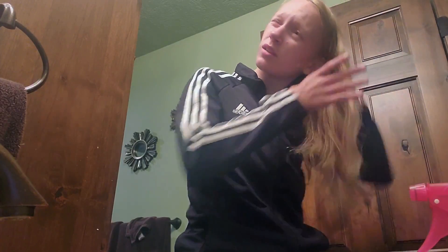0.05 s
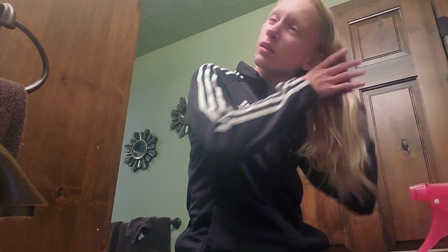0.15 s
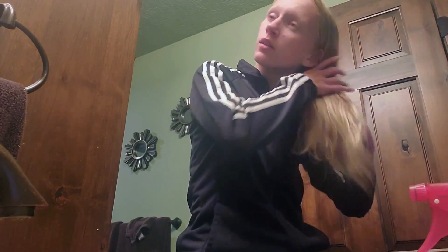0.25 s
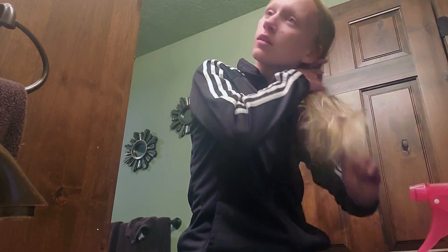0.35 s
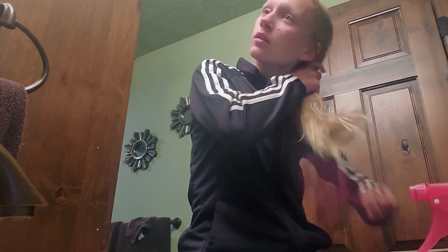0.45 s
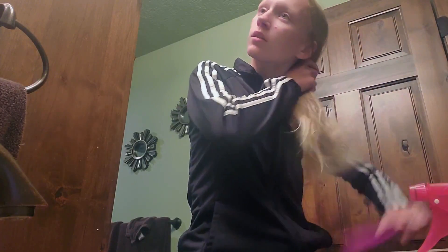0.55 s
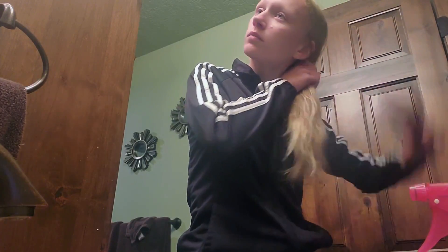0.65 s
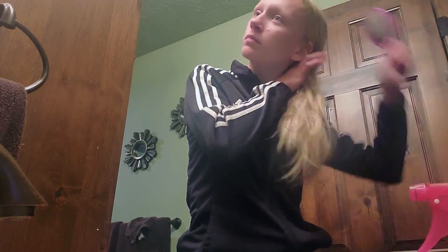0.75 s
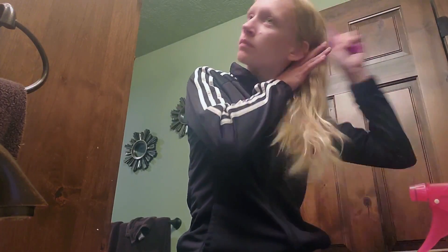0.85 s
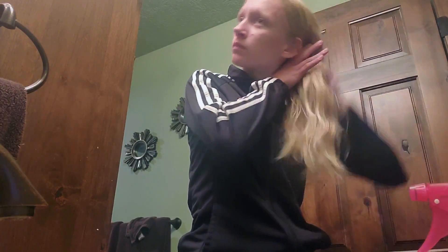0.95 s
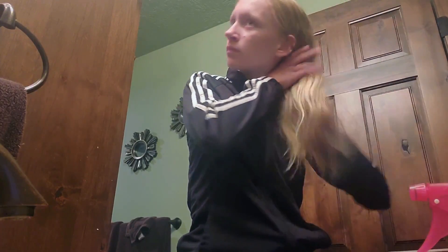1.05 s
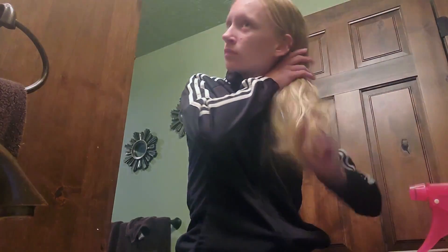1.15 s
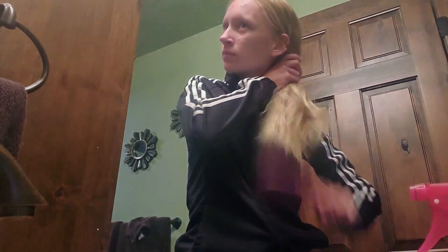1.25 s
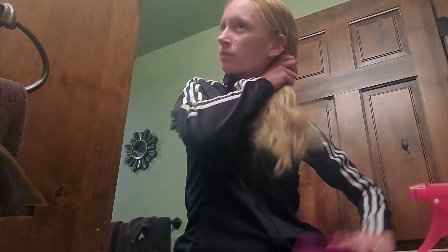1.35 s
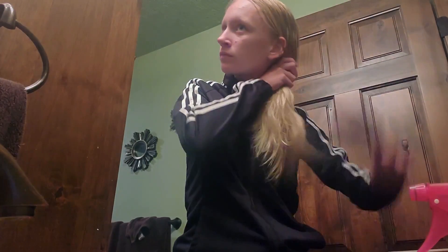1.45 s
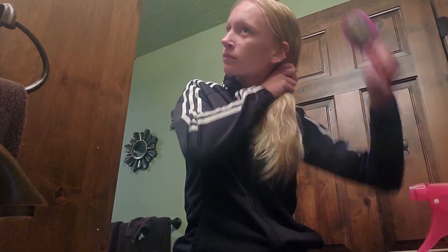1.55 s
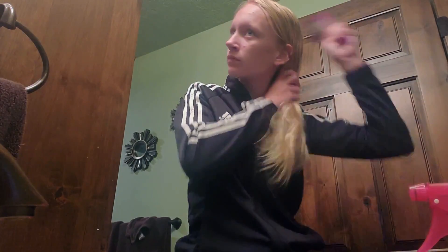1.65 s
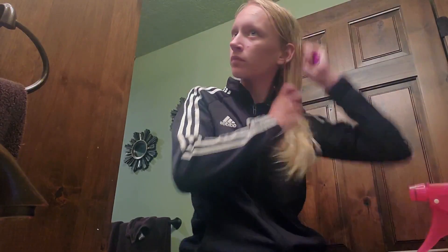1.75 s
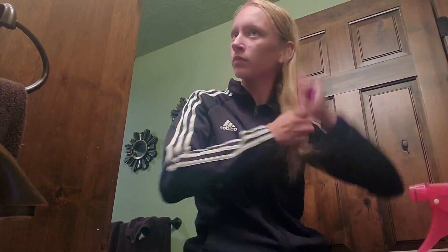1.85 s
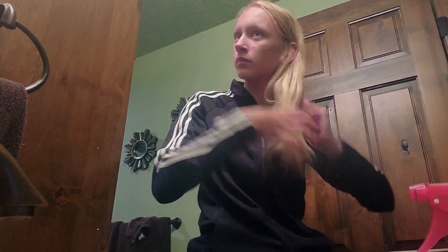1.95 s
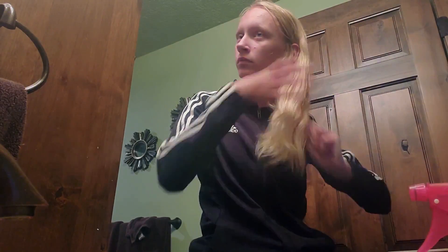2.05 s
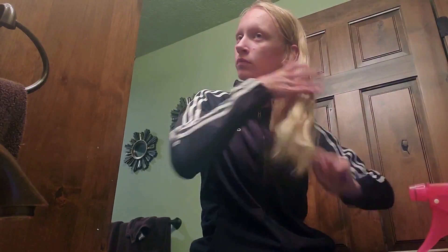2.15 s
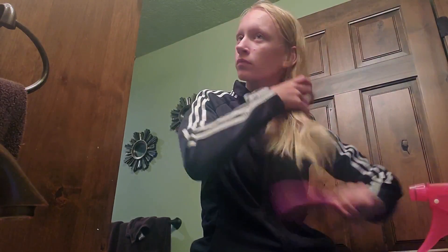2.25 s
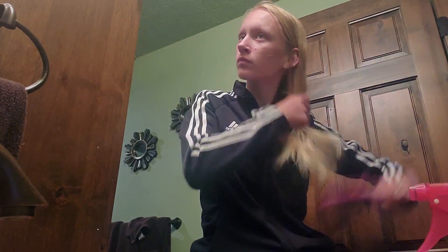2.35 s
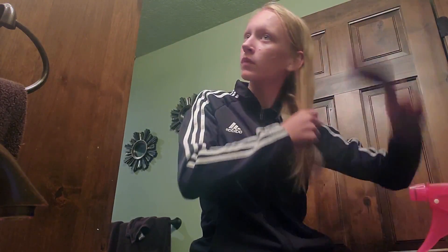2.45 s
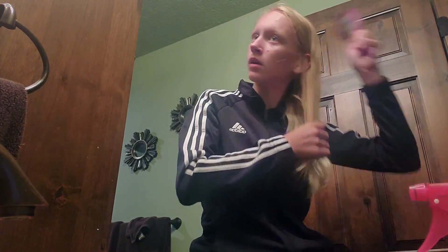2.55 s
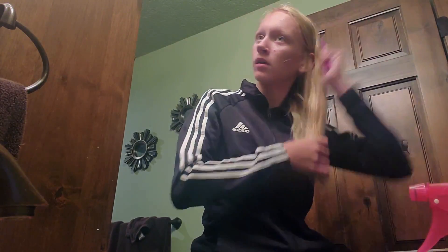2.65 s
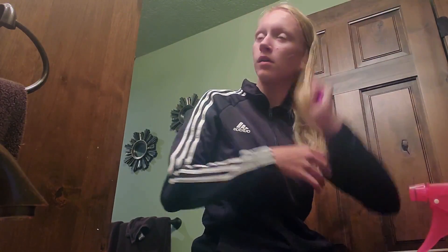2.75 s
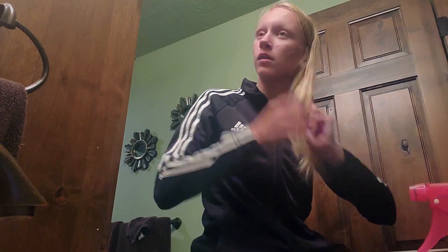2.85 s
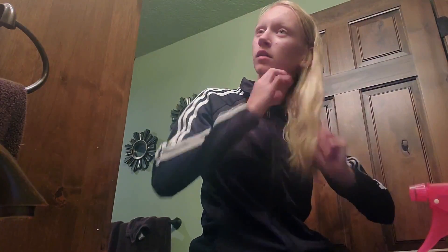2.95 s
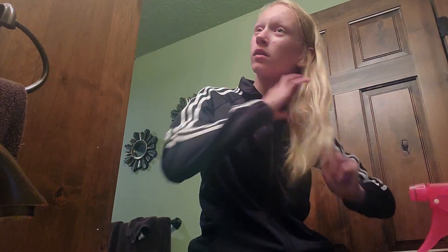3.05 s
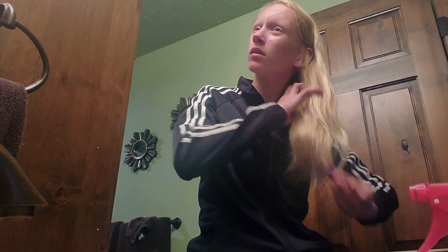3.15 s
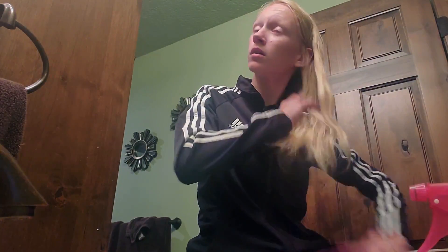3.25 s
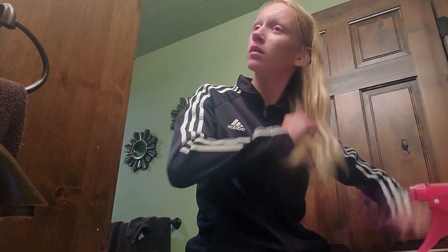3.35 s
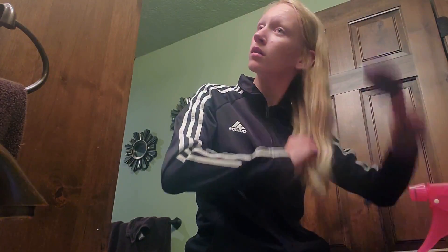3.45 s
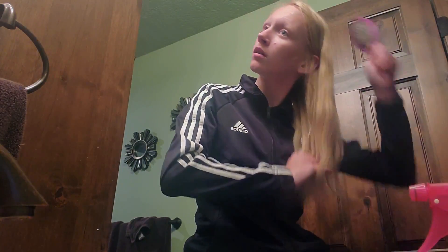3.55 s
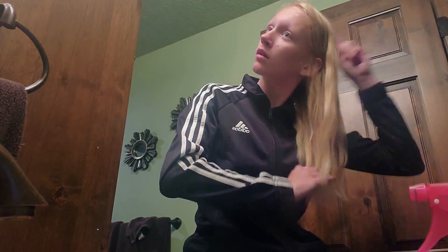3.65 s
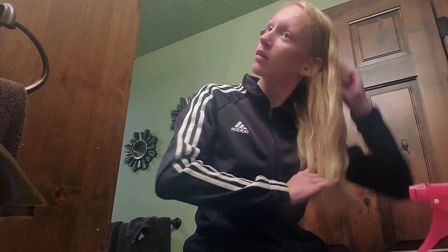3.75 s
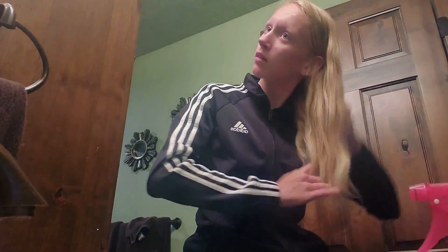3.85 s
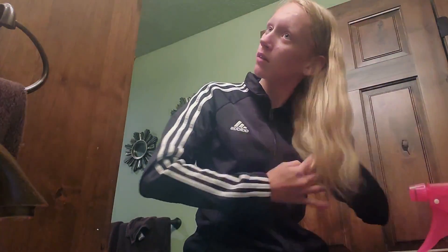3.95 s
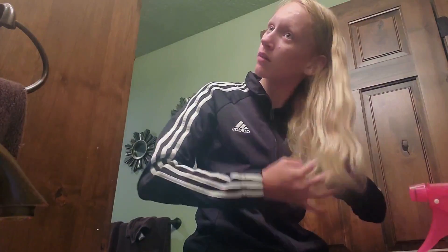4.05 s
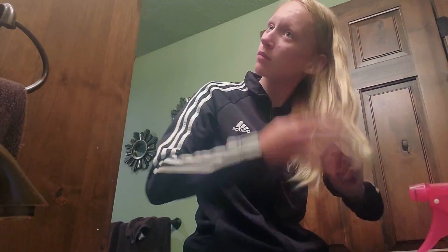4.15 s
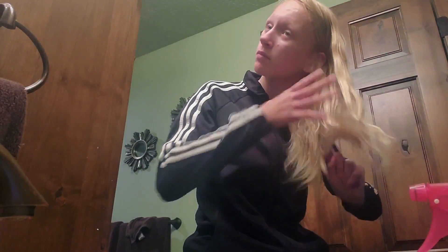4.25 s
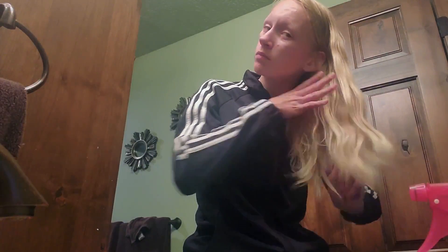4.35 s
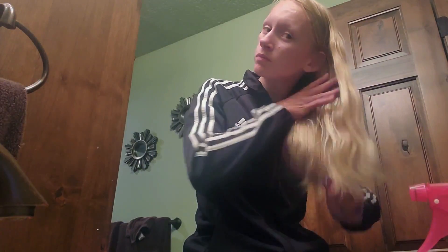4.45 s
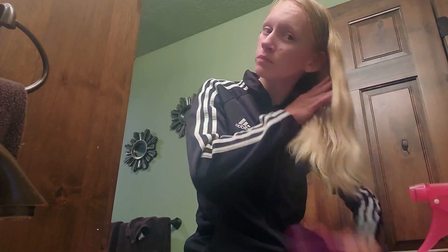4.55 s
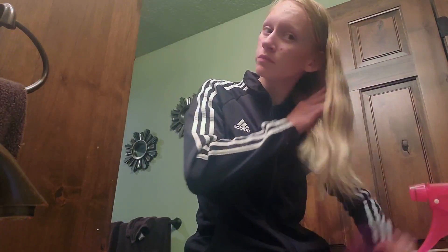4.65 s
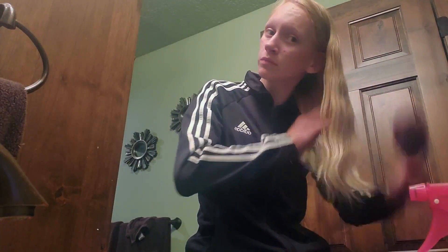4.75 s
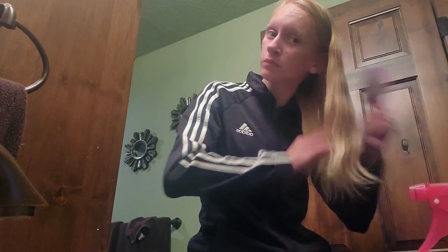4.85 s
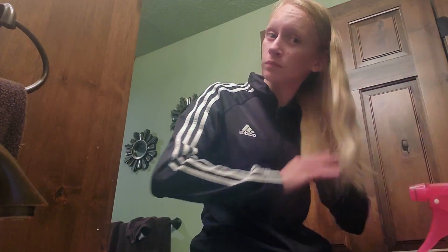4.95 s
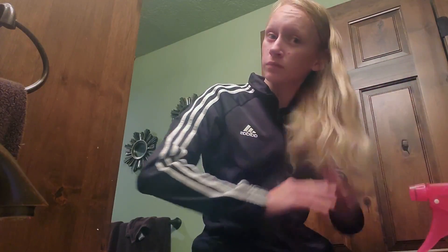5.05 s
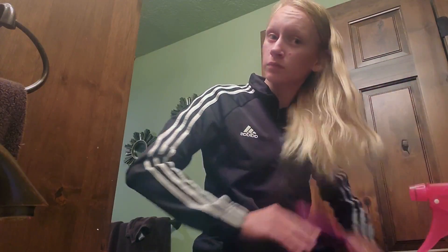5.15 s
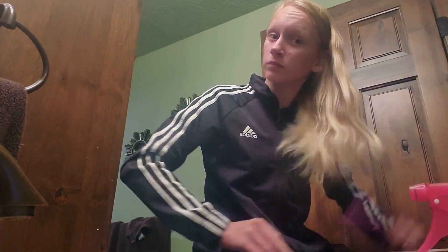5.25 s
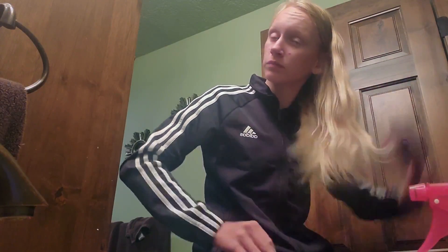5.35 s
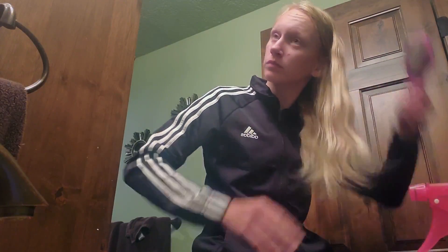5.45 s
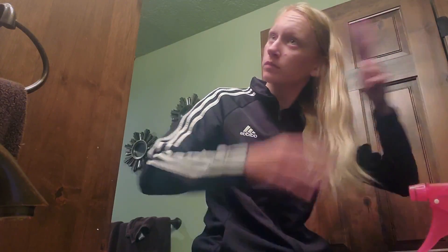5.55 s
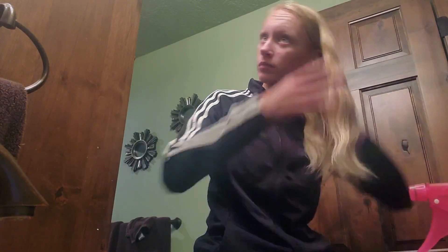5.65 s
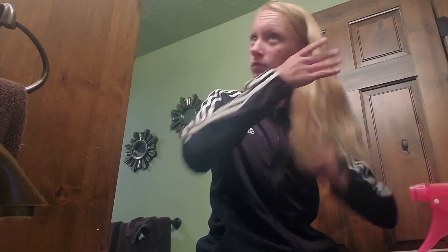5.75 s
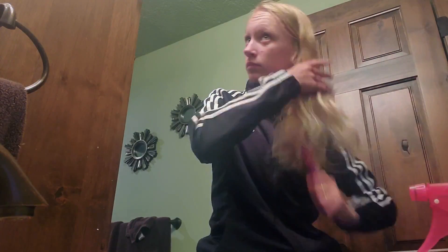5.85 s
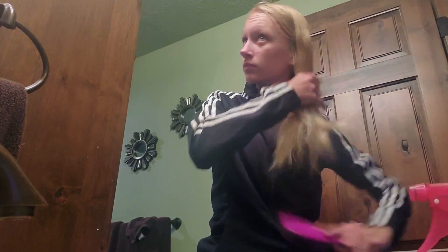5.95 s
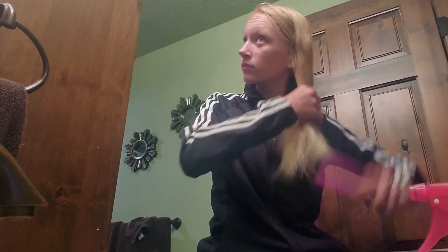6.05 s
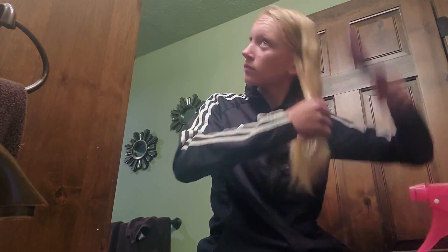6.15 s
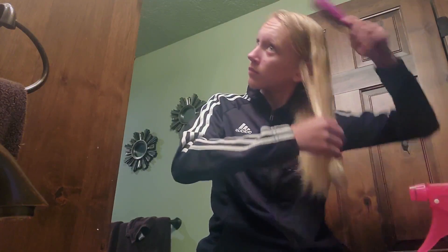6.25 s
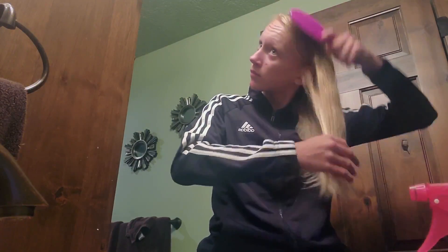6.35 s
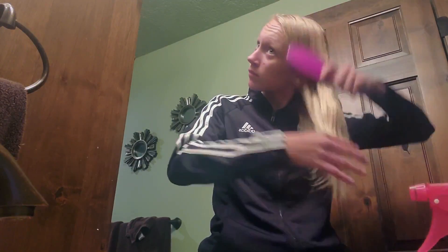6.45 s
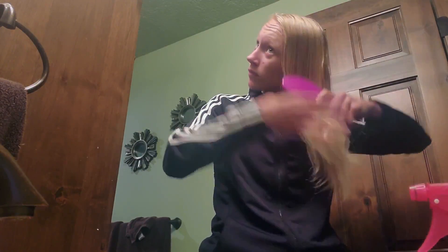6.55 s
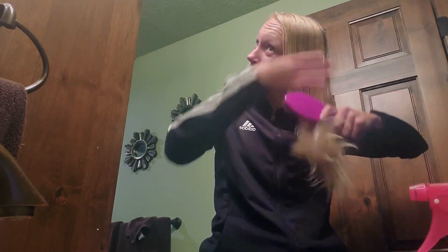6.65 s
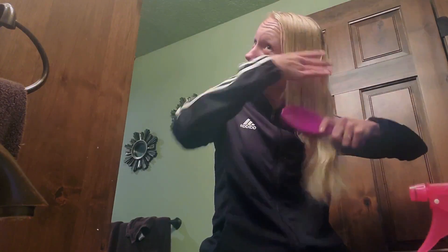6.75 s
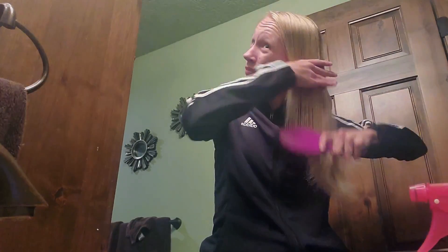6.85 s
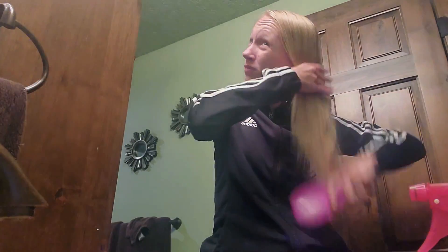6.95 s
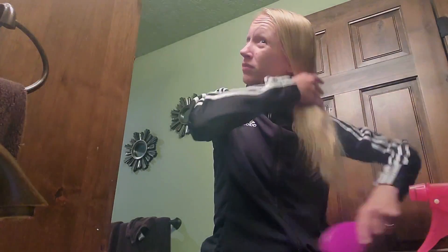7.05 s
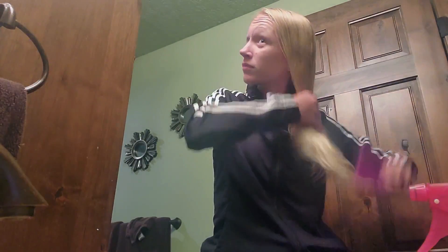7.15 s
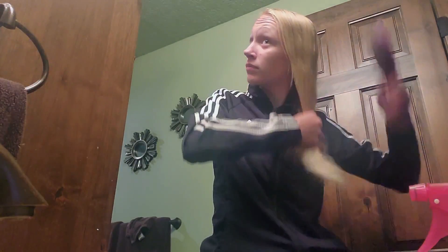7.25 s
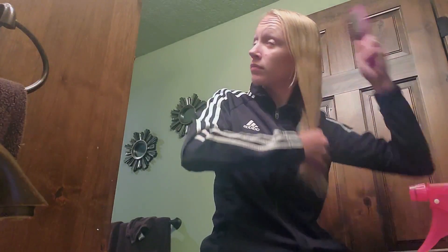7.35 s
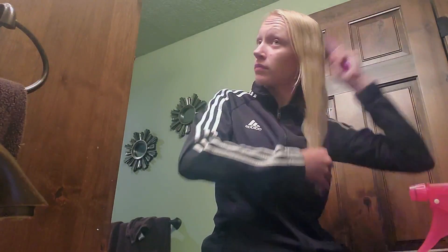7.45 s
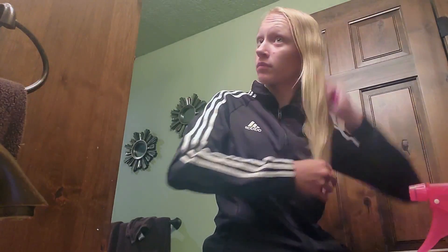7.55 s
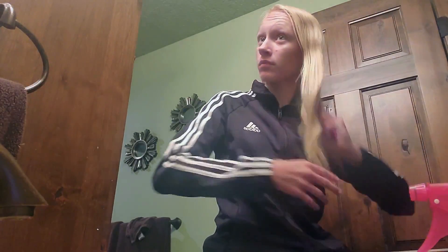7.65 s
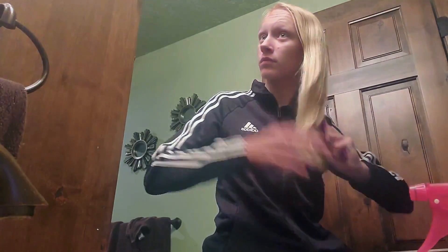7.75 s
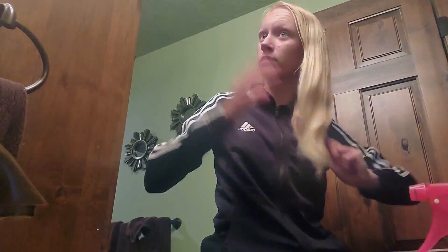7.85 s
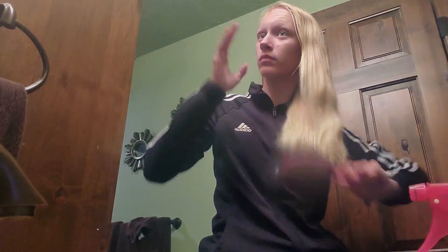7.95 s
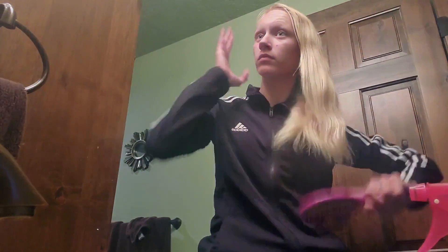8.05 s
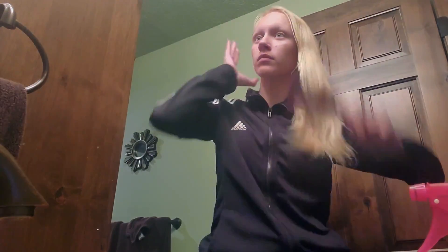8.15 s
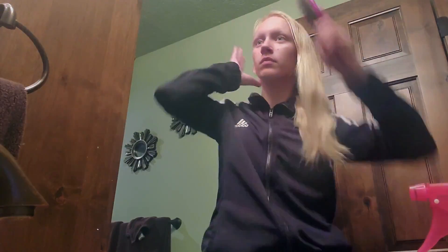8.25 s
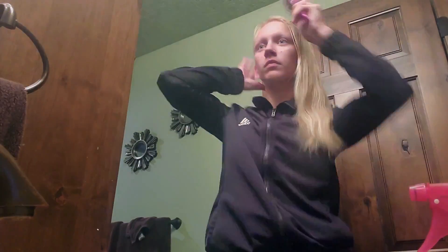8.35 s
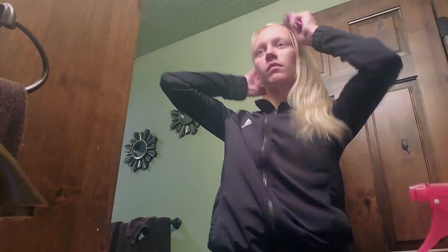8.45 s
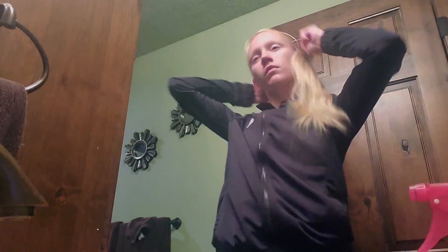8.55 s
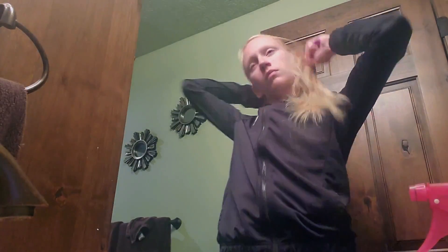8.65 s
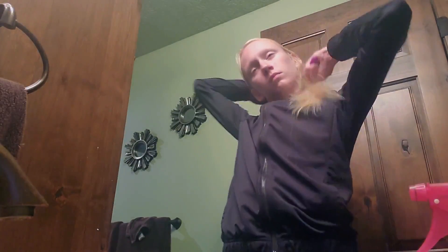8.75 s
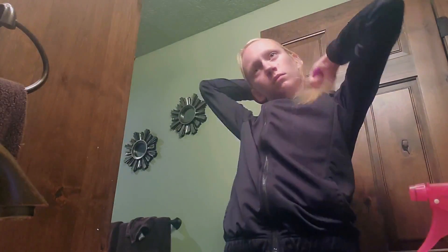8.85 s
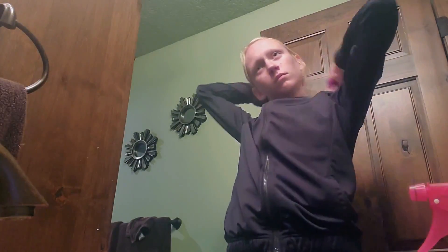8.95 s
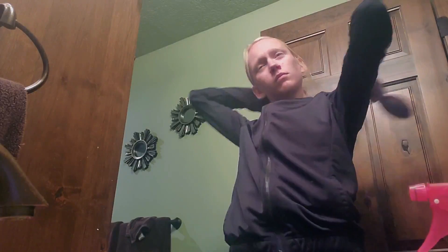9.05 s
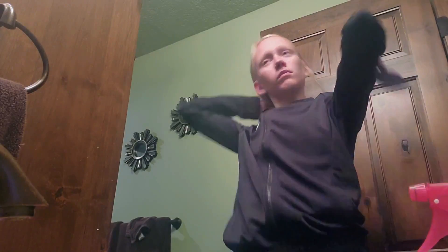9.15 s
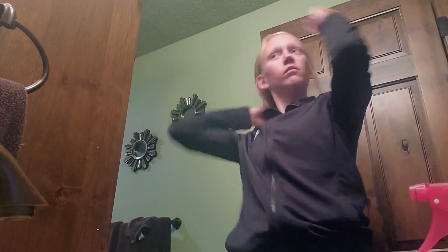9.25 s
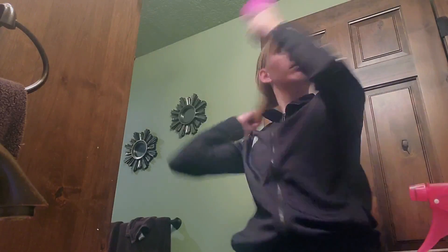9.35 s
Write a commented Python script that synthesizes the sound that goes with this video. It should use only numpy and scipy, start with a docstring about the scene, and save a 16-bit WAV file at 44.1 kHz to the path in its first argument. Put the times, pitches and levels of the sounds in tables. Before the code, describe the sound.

A cushion hairbrush is pulled through long damp hair in a small quiet bathroom, close to a stereo microphone. Strokes start right away and at about 1.0, 1.8, 2.7, 3.8, 4.3, 5.0, 5.6, 6.4, 7.5 and 8.5 seconds, each lasting roughly a quarter to two thirds of a second. They slide with a fine hiss, then rasp and crackle in tangles, with tiny snaps of snagged strands and soft hollow knocks from the pad. The strongest tugs come near 0.4, 1.3, 3.2, 4.5 and 7.9 seconds; the last stroke is gentler and ends around 9.1. Locks flick free with a brief crackle near 1.4, 3.0 and 8.7 seconds. The brush bumps dully against the head near 3.3, 5.0 and 6.4. Between strokes a jacket sleeve swishes very faintly over low, steady room noise.

```python
"""A cushion hairbrush is pulled through long damp hair in quick strokes, in a small quiet bathroom.
Sliding friction gives a fine hiss; in the tangled ends it turns to stick-slip motion and rasps.
Flicking bristles and soft knocks excite the modes of the hollow pad. Snagged strands snap, locks whip
free, the brush bumps the head and a sleeve rustles. A stereo microphone stands close by."""
import sys
import numpy as np
from scipy import signal
from scipy.fft import rfft, irfft, next_fast_len
from scipy.io import wavfile

SR = 44100
rng = np.random.default_rng(int(sys.argv[2]) if len(sys.argv) > 2 else 0)


def master_out(mix):
    """Clip the mix to full scale and print it as 16-bit PCM to the path in sys.argv[1]."""
    frames = np.transpose(np.atleast_2d(mix))
    ceiling = np.clip(frames, -1, 1)
    pcm = np.round(ceiling * 32767).astype(np.int16)
    wavfile.write(sys.argv[1], SR, pcm)


N = 414540
T = np.arange(N) / SR
SIZE = next_fast_len(N + SR)
FREQS = np.maximum(np.arange(SIZE // 2 + 1) * SR / SIZE, 1)


def undb(db):
    """Amplitude ratio of a level in decibels."""
    return 10 ** (np.asarray(db) / 20)

def unit(x):
    """Normalisation to rms 1."""
    return x / np.sqrt(np.mean(x ** 2))

def contour(points):
    """Spectral envelope: gain interpolated between (Hz, dB) points over log frequency."""
    hz, db = np.transpose(points)
    return undb(np.interp(np.log(FREQS), np.log(hz), db))

def resonances(modes, skirt_db):
    """Modal response: powers add, and the gain falls a further skirt_db an octave outside the modes."""
    power = sum(undb(db) ** 2 / (1 + ((FREQS / hz - hz / FREQS) * hz / width) ** 2)
                for hz, width, db in modes)
    octaves_outside = np.abs(np.log2(FREQS / np.clip(FREQS, modes[0][0], modes[-1][0])))
    return np.sqrt(power) * undb(-skirt_db * octaves_outside)

def ring(x, gain):
    """Minimum-phase filter of the given gain: it rings after a blow, never before."""
    cepstrum = irfft(np.log(gain + 1e-6), SIZE)
    cepstrum[1:SIZE // 2] *= 2
    cepstrum[SIZE // 2 + 1:] = 0
    return irfft(rfft(x, SIZE) * np.exp(rfft(cepstrum)), SIZE)[..., :N]

def bend(x, ratio):
    """Resampling shifts every frequency of a steady texture by a moving ratio."""
    place = np.cumsum(ratio) % N
    return np.array([np.interp(place, np.arange(N), channel) for channel in x])

def noise():
    """Uncorrelated white noise for mid and side."""
    return rng.standard_normal((2, N))

def waver(rate):
    """Random modulation: ramps between `rate` Gaussian values a second."""
    points = rng.standard_normal(N // 20)
    return np.interp(T * rate, np.arange(len(points)), points)

def fade(t60):
    """Half a second of exponential decay, falling 60 dB in t60 seconds."""
    return undb(-60 * T[:SR // 2] / t60)

def add(out, s, sound):
    """Superposition of a sound starting at s seconds."""
    start = int(s * SR)
    out[:, start:start + sound.shape[-1]] += sound[..., :N - start]

def slips(rate, scatter_db, t60):
    """Shot noise: tiny decaying bursts of uneven size, on average `rate` a second; rms 1."""
    onsets = rng.random(N) < rate / SR
    sizes = onsets * undb(scatter_db * np.minimum(rng.exponential(size=N), 3))
    energy = signal.lfilter([1], [1, -undb(-120 / (t60 * SR))], sizes ** 2)
    return unit(np.sqrt(energy) * noise())

def catches(rate, size, hold_s):
    """Stick-slip force: it jumps as strands catch at random and relaxes as they let go; rms 1."""
    jumps = (rng.random(N) < rate / SR) * size * rng.uniform(0.71, 1, N)
    energy = signal.lfilter([1], [1, -np.exp(-1 / (hold_s * SR))], jumps ** 2)
    return unit(np.sqrt(1 + energy))

def contact(length_s, swell_db, attack_s, release_s=0.023):
    """Contact envelope: it eases in, swells as hair gathers ahead of the brush, and decays once free."""
    t = T[:int((length_s + .5) * SR)]
    attack = np.sin(np.pi / 2 * np.minimum(t / attack_s, 1)) ** 1.415
    progress = np.minimum(t / length_s, 1)
    release = np.exp(-np.maximum(t - length_s, 0) / release_s)
    return attack * undb(swell_db * (progress - .5)) * release


# The brush slides down the hair. Each row: start, length and settling time of the hair in seconds,
# pull, friction and swell in dB, pitch ratio of the pad.
STROKES = [(0.021, 0.41, 0.0046, -53.5, -60.5, 17.5, 1.126), (0.964, 0.37, 0.056, -48, -53.5, 22, 1.064),
           (1.763, 0.46, 0.067, -47, -52, 12, 1.08), (2.725, 0.6, 0.088, -47, -51, 10, 1.08),
           (3.756, 0.5, 0.097, -52.5, -56.5, 2.5, 1.08), (4.28, 0.28, 0.016, -51.5, -55, 1.5, 1.0),
           (5.029, 0.2297, .12, -52.5, -61, 5, 0.98), (5.644, 0.3, .02, -58, -60.5, 16, 1.12),
           (6.411, 0.62, 0.15, -62.5, -58, 2.5, 1.23), (7.529, 0.48, .11, -50, -56, 6.5, 1.074),
           (8.501, 0.595, .16, -55.5, -56.5, 0.5, 1.14)]
# The bristles dig in or drag through a tangle. Each row: start and length in seconds, pull, friction
# and swell in dB, pitch ratio of the pad, handle thud and bristle rasp in dB.
TUGS = [(0.0, 0.028, -53, -54, -5, 1.16, -0.5, -7), (0.206, 0.11, -48, -52.5, 5.5, 0.99, 9, 9.5),
        (0.331, 0.078, -37, -41, 5.5, 1.006, -1.5, -1.5), (0.428, 0.082, -36, -42.5, 7, 0.9, -3.5, -2.5),
        (1.136, 0.084, -42, -49, 7, 1.13, 1, 3.5), (1.221, 0.095, -34.5, -42.5, 4, 0.94, -3, 0.5),
        (1.78, 0.025, -50, -72, -4, 1.33, 8, 1), (2.099, 0.13, -44, -49.5, 2.5, 1.06, -2, 0),
        (2.224, 0.067, -40, -41, -2, 1.04, 4.5, 3), (3.021, 0.27, -40.5, -45, 2, 1.05, -1, 0.5),
        (3.278, 0.032, -35.5, -43, -2, 0.89, 5, 2.5), (3.767, 0.039, -52, -84, -2, 1.52, -5, -9),
        (4.033, 0.19, -45.5, -56, 0.5, 1.043, -1, 3), (4.354, 0.021, -47, -56, -7, 1.07, 7, 9),
        (4.427, 0.053, -43, -47.5, 5.5, 1.01, -2, 3.5), (4.515, 0.0689, -41, -45, 5.5, 0.98, 4.5, 4.5),
        (5.089, 0.056, -47.5, -50.5, 9.5, 1.05, 6, 2), (5.145, 0.05, -40, -43, -2, 1.0, 2, -2.5),
        (5.82, 0.081, -43.5, -49.5, 2, 1.124, 0.5, 1), (6.398, 0.13, -58.5, -73, 6, 1.02, 1, 0),
        (6.848, 0.13, -56.5, -58.5, 7.5, 0.98, 4.5, 6), (6.982, 0.047, -43, -51.5, 4, 0.96, 6, 6.5),
        (7.546, 0.035, -53, -67, -2, 1.5, 3, -17), (7.772, 0.019, -44.5, -52.5, 2, 1.004, -4, 0),
        (7.916, 0.12, -37, -43.5, 1, 1.05, 2.5, 2.5), (8.694, 0.098, -49.5, -50.5, -6, 1.43, -1.5, 1.5),
        (9.003, 0.077, -45.5, -52.5, 4.5, 0.98, 2, -7)]

def drag(bite_s=0.00636, pull_lead=0.56, slide_thud_db=-0.5, slide_rasp_db=-0.5):
    """Strokes and tugs add in power; pad pitch, thud and rasp are means weighted by the pull's power."""
    # in a stroke the pull builds before the hair has settled; a tangle bites at once
    slides = [(s, length_s, *rest, slide_thud_db, slide_rasp_db, pull_lead * settle_s, settle_s)
              for s, length_s, settle_s, *rest in STROKES]
    tugs = [(*row, bite_s, bite_s) for row in TUGS]
    sums = np.full((5, N), 1e-18)
    for (s, length_s, pull_db, friction_db, swell_db, pitch, thud_db, rasp_db,
         pull_rise_s, friction_rise_s) in slides + tugs:
        pull = (undb(pull_db) * contact(length_s, swell_db, pull_rise_s)) ** 2
        friction = (undb(friction_db) * contact(length_s, swell_db, friction_rise_s)) ** 2
        add(sums, s, np.array([pull, friction, pull * pitch, pull * thud_db, pull * rasp_db]))
    pull, friction, *weighted = sums
    timbre = np.array(weighted) / pull
    uneven_db = 0.23 * waver(rate=43)  # the hair lies unevenly
    return 10 * np.log10(pull) + uneven_db, 10 * np.log10(friction) + uneven_db, *timbre


# Modes of the hollow-backed cushion and of the plastic bristles.
# Each row: frequency in Hz, bandwidth in Hz, relative level in dB.
PAD_MODES = [(397.6, 56, 0), (589, 96, 4.5), (690, 58, -3.5), (770, 123, -0.5), (1094, 65, -8.5),
             (1347, 46, -11)]
BRISTLE_MODES = [(1690, 93, -14), (2354, 620, -3), (2550, 230, -4.5), (2890, 170, -3)]
# Spectra of the handle and tensed hair giving way, of sliding hair and of tearing hair.
# Each row: frequency in Hz, relative spectral density in dB.
HANDLE_SPECTRUM = [(22, -42), (40, -10.5), (65, -2), (110, -2.5), (185, -10.5), (260, -1), (350, -5.5),
                   (500, -10.5), (900, -27.5), (2500, -47)]
SLIDE_SPECTRUM = [(900, -13.5), (1500, 5.5), (3000, 6.5), (3900, 3), (5000, 4), (6900, 5), (8000, 3),
                  (10000, -2), (12500, -0.5), (15500, -2.5)]
TEAR_SPECTRUM = [(900, -17), (1500, -0.5), (3000, -3), (3900, 0), (5000, 1), (6900, 2), (8500, 0),
                 (10000, -4), (13800, -0.5), (15500, -7)]

def brushing():
    """Stick-slip friction: strands slide smoothly under light drag and tear free in jerks under heavy."""
    pull_db, friction_db, pitch, thud_db, rasp_db = drag()
    tangled = np.clip((friction_db + 53.5) / 14, 0, 1)
    jerks = catches(rate=160, size=1.9, hold_s=.002)
    # jerks flick bristles against the pad, which rings higher on the head and lower under a load of hair
    flicks = jerks * slips(rate=1800, scatter_db=-1.5, t60=0.0035)
    pad = unit(ring(flicks, resonances(PAD_MODES, skirt_db=7.0)))
    pad = bend(pad, pitch) * undb(pull_db - 1.0)
    handle = unit(ring(jerks * noise(), contour(HANDLE_SPECTRUM)))
    handle *= undb(pull_db + thud_db - 12.5 + 3 * tangled)
    scrapes = jerks * slips(rate=1700, scatter_db=-1.5, t60=0.0092)
    bristles = unit(ring(scrapes, resonances(BRISTLE_MODES, skirt_db=25.5)))
    bristles *= undb((pull_db + friction_db) / 2 + rasp_db - 12 + 7.9 * tangled)
    hiss = slips(rate=5000, scatter_db=0.6, t60=0.009)
    slide = unit(ring(hiss, contour(SLIDE_SPECTRUM))) * undb(friction_db - 1.0)
    crackle = jerks * slips(rate=2200, scatter_db=1.3, t60=0.005)
    tear = unit(ring(crackle, contour(TEAR_SPECTRUM))) * undb(friction_db - 0.5)
    return pad + handle + bristles + np.sqrt(1 - tangled) * slide + np.sqrt(tangled) * tear


# The still room. Each row: frequency in Hz, relative spectral density in dB.
AMBIENT_SPECTRUM = [(25, -27), (40, -2), (60, 8.5), (80, -4.5), (110, -4.5), (195, -11), (245, -7),
                    (360, -26), (620, -17), (1300, -32.5), (2500, -28.5), (3500, -30.5), (5500, -21.5),
                    (9500, -29), (15500, -34)]

def ambience(air_db=-69, hum_hz=263, hum_db=-80):
    """Noise floor: low rumble, faint hiss and a weak hum modulated in amplitude and phase."""
    air = unit(ring(noise(), contour(AMBIENT_SPECTRUM)))
    hum = undb(3 * waver(rate=6)) * np.sin(2 * np.pi * hum_hz * T + waver(rate=10))
    return undb(air_db) * air + undb(hum_db) * hum


# The pad knocks on the head or springs back from a tangle.
# Each row: start in seconds, relative level in dB, pitch in Hz.
KNOCKS = [(0.334, -25.5, 584), (0.427, -23, 594), (0.491, -28, 690), (0.522, -27, 611.6), (1.139, -31, 741),
          (1.307, -19.5, 653), (1.324, -24.5, 623.6), (1.782, -34.5, 566), (2.035, -32.5, 560.8),
          (2.225, -25, 655.7), (2.733, -30, 525), (3.014, -31, 840.4), (3.281, -20, 691),
          (3.77, -40, 545.6), (4.403, -32.5, 633), (4.517, -26.5, 701.6), (4.564, -22, 687),
          (5.824, -32, 874), (6.402, -56.5, 699), (7.044, -33, 633.4), (7.548, -37.5, 570.5),
          (7.776, -33.5, 639.1), (7.894, -31, 626), (8.351, -53, 680), (8.895, -32.5, 666),
          (8.942, -38.5, 681.4), (8.982, -35, 669)]

def knocks(upper_hz=1070, upper_growth=0.36, t60=0.079, rise_s=0.0023, jolt_db=-15, gain_db=-2.0):
    """Impact excites two damped pad modes, the upper growing less with force, and jolts the handle."""
    rings, blows, t = np.zeros((2, N)), np.zeros((2, N)), T[:SR // 2]
    envelope = undb(gain_db) * fade(t60) * (1 - np.exp(-t / rise_s))
    for s, db, hz in KNOCKS:
        lower = undb(db) * np.sin(2 * np.pi * hz * t)
        upper = undb(upper_growth * db - 32) * np.sin(2 * np.pi * upper_hz * t)
        add(rings, s, envelope * (lower + upper))
        add(blows, s, envelope * undb(db))
    handle = unit(ring(noise(), contour(HANDLE_SPECTRUM)))
    return rings + undb(jolt_db) * blows * handle


# A snagged strand snaps off a bristle. Each row: start in seconds, relative level in dB, pitch in Hz.
SNAPS = [(0.337, -40, 8000), (0.379, -25, 7800), (0.4, -36, 6800), (0.4906, -18, 9000),
         (1.237, -18.5, 5900), (2.095, -28, 5570), (2.227, -17.5, 7100), (2.53, -25.5, 6400),
         (2.9286, -28.5, 6885), (3.1057, -22.5, 7370), (3.1246, -22.5, 7376), (3.2814, -16.5, 6980),
         (4.183, -28.5, 6880), (4.1996, -26, 6996), (4.3544, -32.5, 8950), (4.4289, -21.5, 6980),
         (4.4503, -26, 6704), (4.4686, -18.5, 10400), (5.1433, -20, 7400), (5.8333, -20.5, 6793),
         (5.887, -24, 6950), (7.787, -26, 6854), (7.9824, -26, 6766), (8.019, -22, 6160),
         (8.7023, -30, 6432)]

def snaps(t60=0.014, width_hz=1700, crack_db=-14, gain_db=-4.0, lowest_hz=4400):
    """Impulsive release: a broadband crack excites the brief resonance of one bristle tip."""
    out = np.zeros((2, N))
    for s, db, hz in SNAPS:
        crack = rng.standard_normal((2, SR // 2)) * fade(t60)
        tip = signal.lfilter(*signal.iirpeak(hz, hz / width_hz, fs=SR), crack)
        tick = tip + undb(crack_db) * crack
        add(out, s, tick * undb(db + gain_db) / np.abs(tick).max())
    return signal.sosfilt(signal.butter(4, lowest_hz, "high", fs=SR, output="sos"), out)


# The arm swings. Each row: centre in seconds, level in dB, half length in seconds.
ARM_SWINGS = [(0.843, -77.5, 0.085), (1.565, -70, 0.072), (1.744, -65, 0.082), (2.629, -64, 0.098),
              (3.54, -79, 0.079), (4.857, -69.5, 0.36), (5.499, -95.5, 0.094), (6.241, -69, 0.055),
              (7.361, -73, 0.053), (8.27, -71.5, 0.17), (9.278, -70, 0.23)]
# Rubbing cloth. Each row: frequency in Hz, relative spectral density in dB.
CLOTH_SPECTRUM = [(200, -10.5), (450, 7.5), (680, 1.5), (1200, -10), (2500, -8), (3400, -12), (5000, -5.5),
                  (6800, -7.5), (10000, -18.5), (12500, -14.5), (15500, -26)]

def sleeve():
    """Friction noise of a jacket sleeve swells and fades with each swing of the arm."""
    swing = sum(undb(db) * np.exp(-((T - s) / half_s) ** 2) for s, db, half_s in ARM_SWINGS)
    flutter = undb(2 * waver(rate=59))
    return swing * flutter * unit(ring(noise(), contour(CLOTH_SPECTRUM)))


# A lock of hair whips free. Each row: start in seconds, level in dB, 60 dB decay time in seconds,
# brightest frequency in Hz, its prominence in dB.
WHIPS = [(1.375, -32.5, .11, 2200, 6.5), (2.583, -51, 0.11, 5180, 12), (3.02, -43, 0.32, 7004, 26),
         (6.038, -62.5, 0.078, 2470, 10), (8.701, -42.5, 0.3, 6290, 16)]

def whips(width_hz=1600):
    """Many strands let go at once; their impulses merge into a crackle that decays exponentially."""
    out = np.zeros((2, N))
    crackle = ring(slips(rate=5000, scatter_db=2, t60=.002), contour(TEAR_SPECTRUM))
    for s, db, t60, hz, peak_db in WHIPS:
        spray = np.roll(crackle, -int(s * SR), axis=1)[:, :SR // 2]
        peak = undb(peak_db) * signal.lfilter(*signal.iirpeak(hz, hz / width_hz, fs=SR), spray)
        add(out, s, undb(db) * unit(spray + peak) * fade(t60))
    return out


# The brush bumps dully against the head. Each row: start in seconds, peak level in dB, pitch in Hz.
BUMPS = [(3.268, -38.5, 112), (5.035, -54, 122), (6.399, -45, 94.8)]

def bumps(t60=0.18, rise_s=0.011):
    """Compliant impact: the soft contact builds slowly and leaves one low damped oscillation."""
    out, t = np.zeros((2, N)), T[:SR // 2]
    for s, db, hz in BUMPS:
        thud = np.sin(2 * np.pi * hz * t) * fade(t60) * (1 - np.exp(-t / rise_s))
        add(out, s, undb(db) * thud / thud.max())
    return out


# Reverberation times in seconds: low band, then high band.
ROOM_T60_S = (.38, .2)

def bathroom(x, split_hz=1000, low_db=-9, high_db=-12, delay_s=0.0005):
    """Reverberation: close walls reflect within milliseconds, and the lows linger longest."""
    reflections = rng.standard_normal((2, SR // 2))
    lows = signal.sosfilt(signal.butter(1, split_hz, fs=SR, output="sos"), reflections)
    onset = np.clip(T[:SR // 2] / delay_s - 1, 0, 1)
    tail = 0
    for band, t60, db in zip((lows, reflections - lows), ROOM_T60_S, (low_db, high_db)):
        decay = fade(t60) * onset
        tail = tail + band * decay * undb(db) / np.linalg.norm(decay)
    return x + signal.fftconvolve(x, tail, axes=1)[:, :N]


# Stereo width. Each row: frequency in Hz, gain of side over mid in dB.
STEREO_WIDTH = [(120, -16), (330, -16.5), (650, -14), (900, -6), (1400, 7.5), (2200, -4.5), (2900, -1),
                (3800, 2), (5500, -0.5), (7200, 1), (10000, -0.5), (15000, -0.5)]
# Stereo balance. Each row: frequency in Hz, gain of left over right in dB.
STEREO_BALANCE = [(100, 0.5), (550, 0.5), (750, 2), (1100, 4), (2500, 0.5), (5000, 2.5), (6800, 4.5),
                  (7900, -2), (10000, -1.5), (13500, -1), (15500, 6)]

def microphone(mid, side):
    """Mid-side stereo: the two ports are coherent in the bass and differ in the treble."""
    side = ring(side, contour(STEREO_WIDTH))
    lean = np.sqrt(contour(STEREO_BALANCE))
    return np.array([ring(mid + side, lean), ring(mid - side, 1 / lean)])

def scene():
    """Superposition: all sources reverberate in the room and reach the microphone over its noise floor."""
    sources = brushing() + snaps() + knocks() + bumps() + whips() + sleeve()
    mid, side = bathroom(sources) + ambience()
    return microphone(mid, side)

def record(dry, top_hz=16000):
    """Band limiting: a steep elliptic low-pass cuts the highest treble."""
    return signal.sosfilt(signal.ellip(10, .2, 70, top_hz, fs=SR, output="sos"), dry)


dry = scene()
out = record(dry)
master_out(out)
```